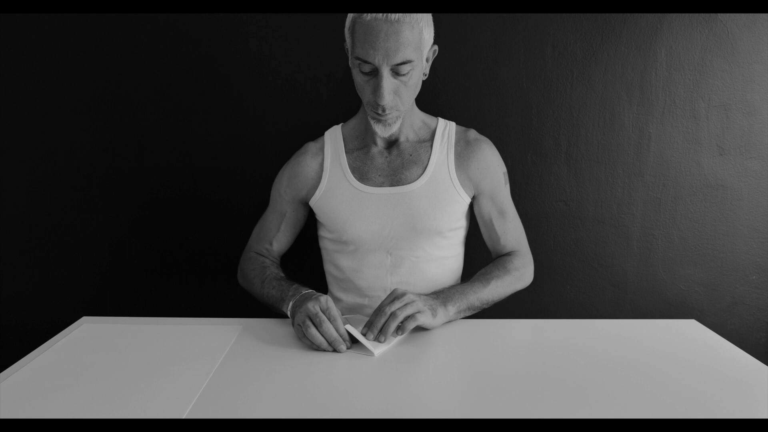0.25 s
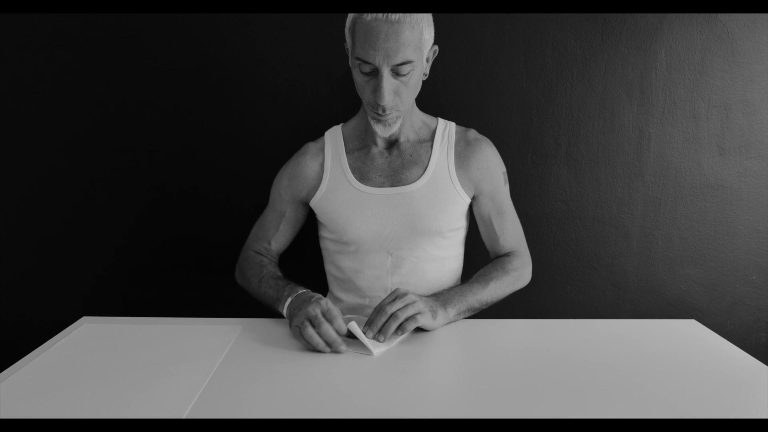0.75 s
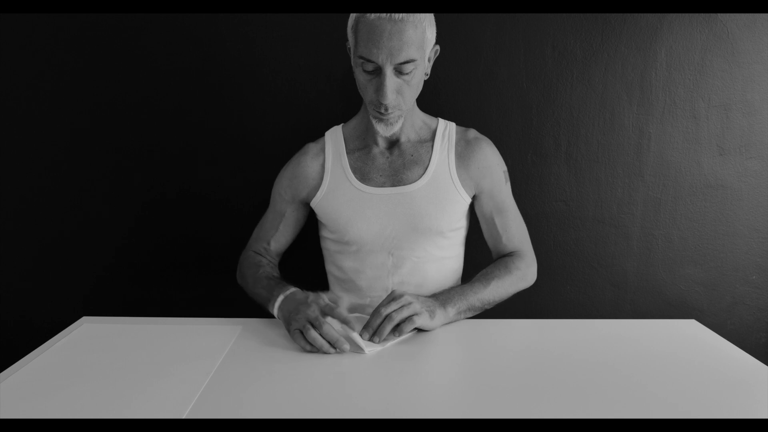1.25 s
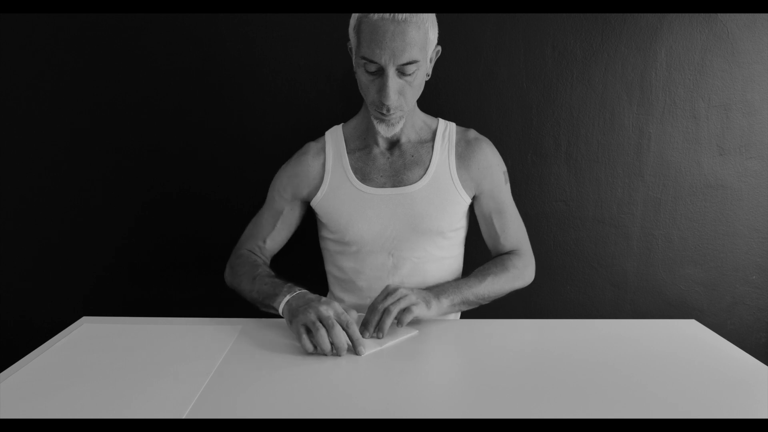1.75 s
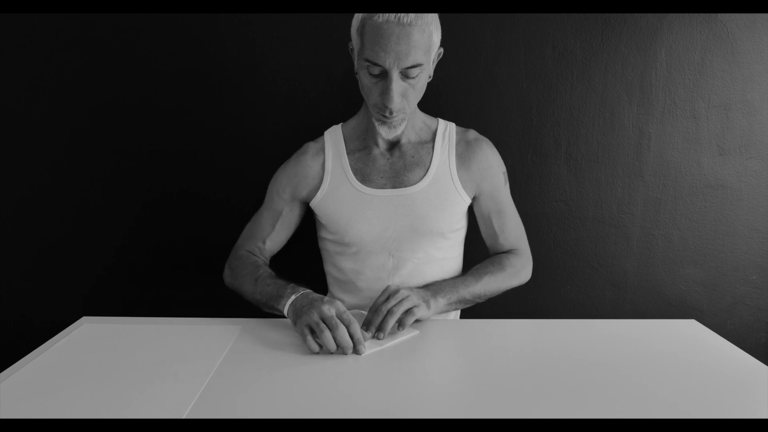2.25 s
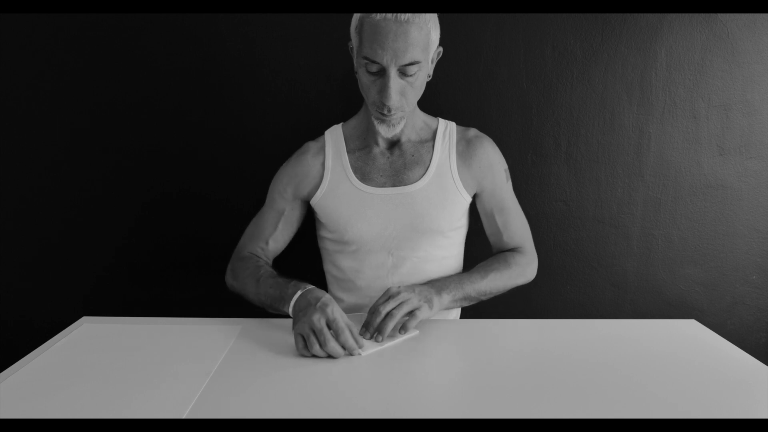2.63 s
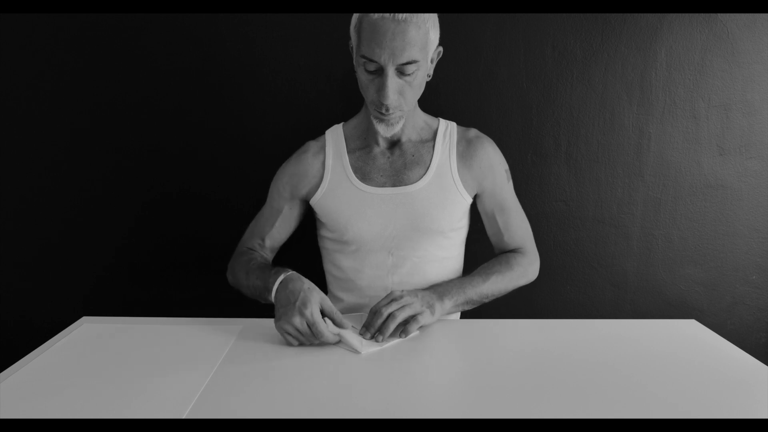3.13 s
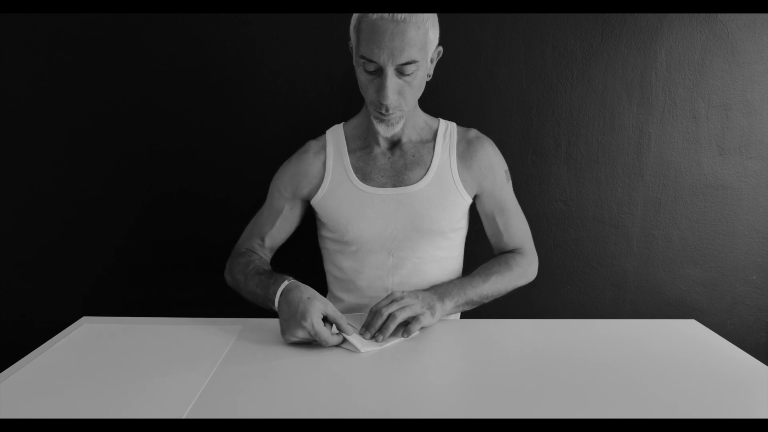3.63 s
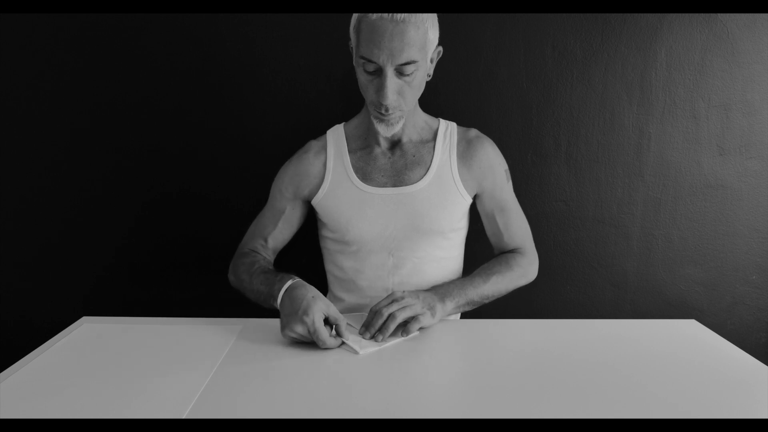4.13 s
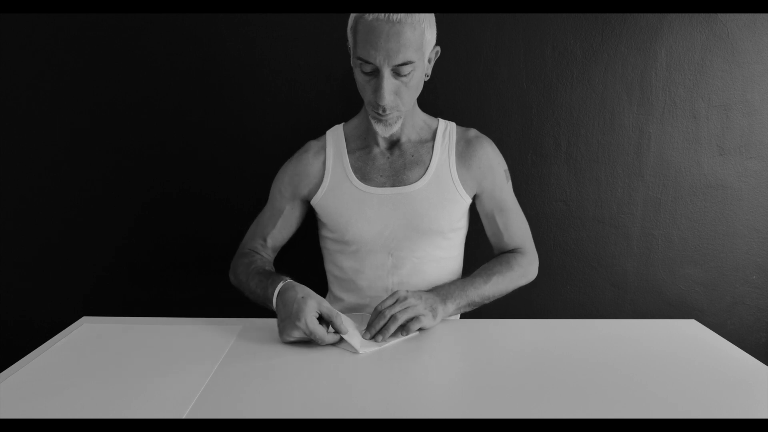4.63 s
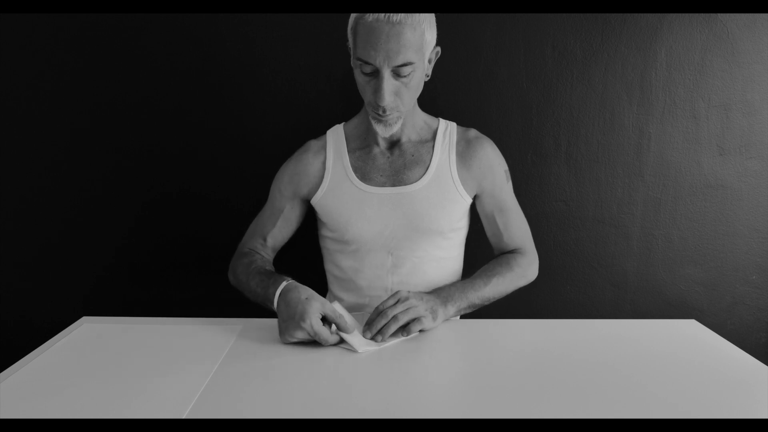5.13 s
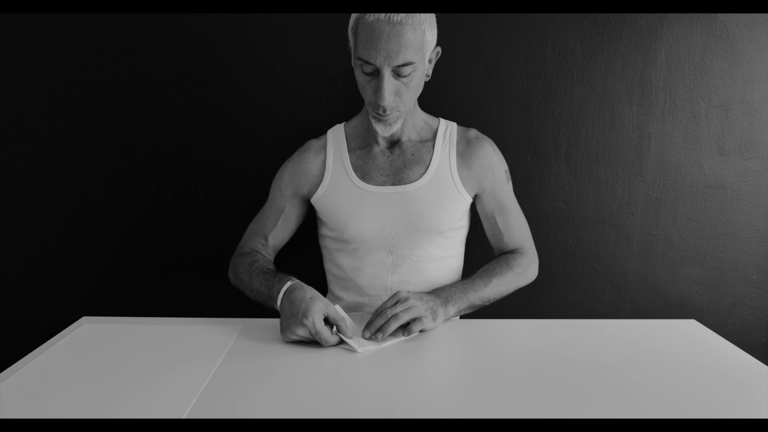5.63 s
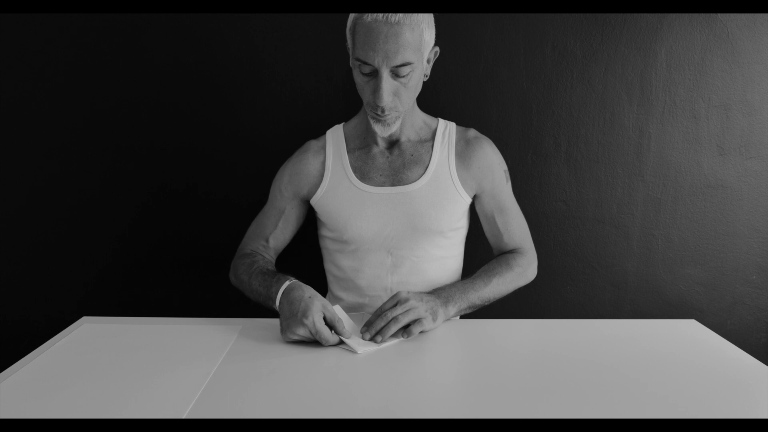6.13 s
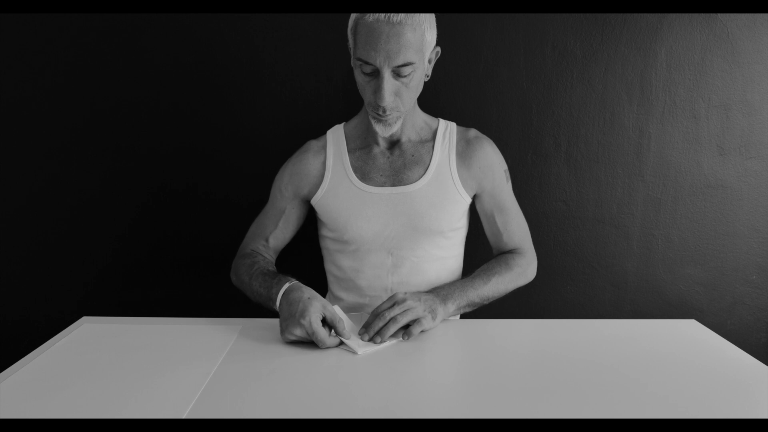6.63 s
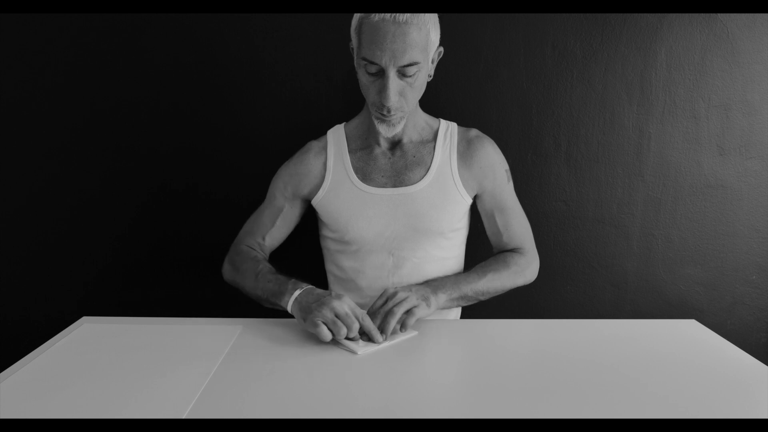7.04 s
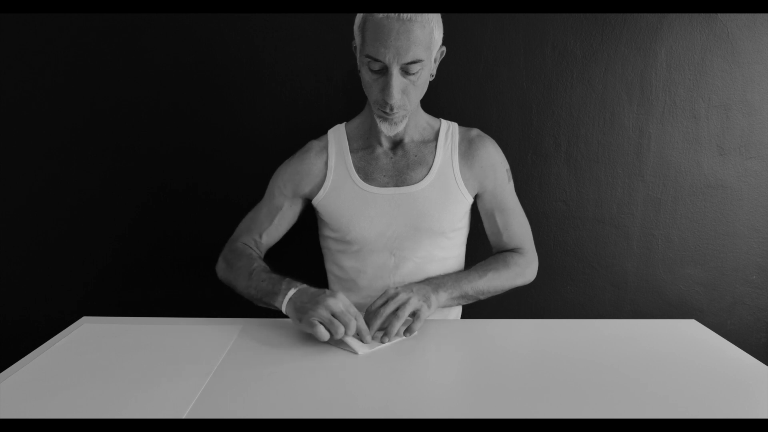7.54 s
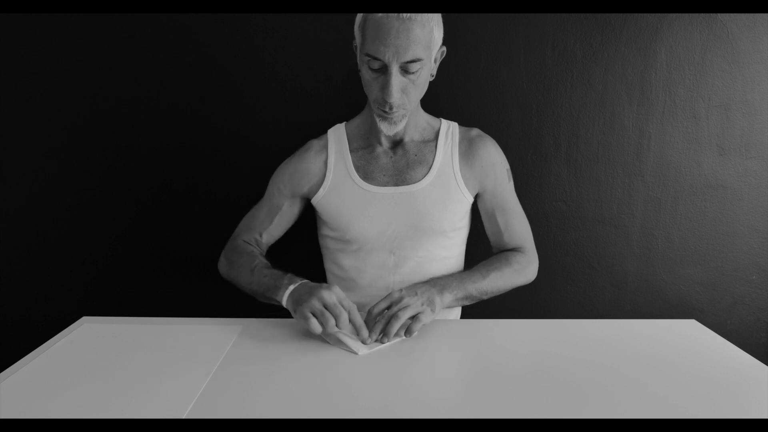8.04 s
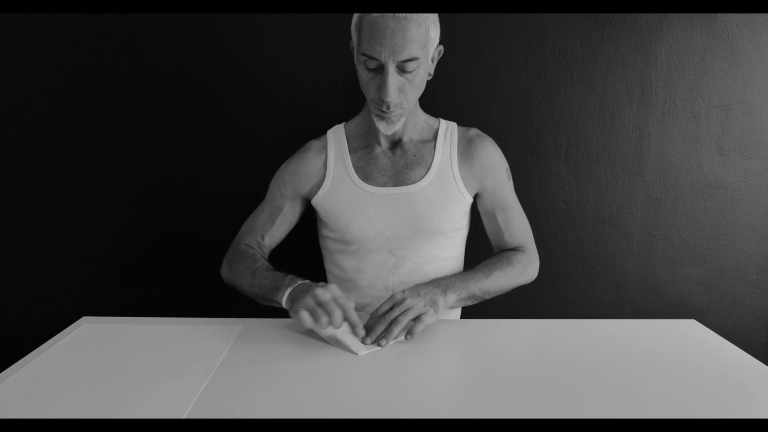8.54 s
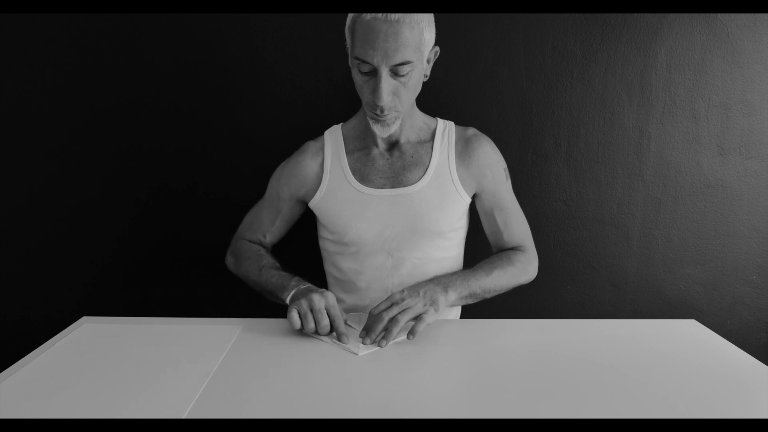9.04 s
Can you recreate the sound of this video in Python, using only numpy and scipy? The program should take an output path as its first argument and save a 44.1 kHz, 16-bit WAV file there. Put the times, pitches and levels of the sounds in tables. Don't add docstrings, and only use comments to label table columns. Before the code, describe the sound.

In a bare, hard-walled room, hands fold a small stiff paper sheet on a table, heard from a few metres by a stereo camera microphone. Creases snap at 0 and 0.25 s with short hissing rubs, then light rustles. At 1.3 s a crease and a tabletop slap, then almost nothing until a hard crack at 2.7 s and a shuffle. Around 3.2-3.6 s small ticks, a snap and a breathy whistle of air squeezed from the fold. Frequent snaps and scrapes run from 4.2 to 5.7 s. A distant low motor drones very faintly about 5.7-6.4 s. Sparse creases follow at 6.2 and 6.9 s, small rustles at 7.3-7.5 s, a dull knock with a crease at 7.9 s, and the brightest, loudest crack at 8.4 s with a long rub. Faint ticks end near 9 s. Echoes are clipped short, leaving quiet pauses.

```python
import sys
import numpy as np
from scipy import signal
from scipy.fft import rfft, irfft
from scipy.io import wavfile
from scipy.ndimage import uniform_filter1d

SR = 44100
rng = np.random.default_rng(int(sys.argv[2]) if len(sys.argv) > 2 else 0)


def store_pcm(level_fs):
    pcm = np.round(np.clip(level_fs, -1, 1) * 32767).astype(np.int16)
    wavfile.write(sys.argv[1], SR, np.atleast_2d(pcm).T)


def gain_from_db(level_db):
    decades = np.asarray(level_db, float) / 20
    return 10 ** decades


N = 409248
STEP = 100

# start in seconds, peak in dB, ring of the sheet in Hz,
# echo level in dB, brightness in dB.
CREASES = [(0.0415, -11.5, 1190, -30.5, -3.5), (0.241, -7, 4000, -36, -3), (0.2625, -22, 8700, -28.5, 4),
           (1.276, -14.5, 1200, -28.5, -4), (2.682, -55, 4090, -35.5, 10.5), (2.69, -2, 4000, -23.5, -1.2),
           (3.4361, -8, 2230, -39, -7.5), (7.027, -15.5, 2770, -48, 8), (4.2112, -6.5, 7000, -33.5, 4),
           (4.5568, -11.5, 2400, -28.5, -6), (4.679, -17, 2290, -33.5, -1.1), (4.692, -16, 2000, -35, -2),
           (5.0616, -8, 3420, -25.5, 0.2), (5.2609, -17, 2170, -42, -2.5), (5.6254, -4.5, 4080, -28, 7.5),
           (5.636, -15.5, 4270, -29.5, -2), (5.6649, -6, 6230, -27.5, -2),
           (6.1821, -18.5, 2740, -34.5, -0.5), (6.9041, -10, 2710, -34.5, 1.5), (7.9238, -9, 2400, -30, -4),
           (8.2582, -19, 2100, -34, -2), (8.327, -17.5, 2980, -36, -1.5), (8.392, -7, 6500, -29, 15.5),
           (8.4066, 0.8, 4770, -33, 13)]
# start in seconds, length in seconds,
# level in dB, brightness in dB, extra middle range in dB.
PULLS = [(.001, 0.15, -26.5, 0, -3), (.562, .04, -44, 5, 2), (.748, .06, -39, 4, 1),
         (.266, 0.1, -18.5, -0.5, 0), (1.228, 0.17, -34, 1, 1.5), (2.685, 0.18, -29.5, 8.5, 11.5),
         (3.155, 0.14, -42.5, 0.5, -4), (3.34, 0.09, -38, -3, -2), (3.44, 0.07, -30, -4.5, 0),
         (4.21, 0.12, -47, 16.5, 17.5), (4.44, 0.11, -46, -11, -13), (4.678, 0.09, -24.5, 1.2, -2.5),
         (4.97, 0.062, -48, -5, 4), (5.06, 0.089, -24, 0.7, 0.5), (5.63, 0.18, -26.5, 5.5, 6),
         (6.19, 0.057, -41.5, 16, 18), (6.91, 0.17, -32, -1.2, 2.5), (7.725, 0.13, -37, -1, -2),
         (7.93, 0.11, -26.5, -5, -1), (8.26, 0.14, -30.5, -3, -14), (8.4, 0.21, -28, 6.5, -8),
         (8.975, 0.1, -44.5, 3, 3)]
# time of the top in seconds, length in seconds,
# level in dB, brightness in dB, extra middle range in dB.
SHUFFLES = [(.57, 0.021, -48, -2, 3), (.22, 0.04, -34, -3, 1), (.41, .04, -40, -5, 2),
            (.78, 0.03, -35, -1, 2), (.86, 0.087, -46.5, -3.5, -3), (1.55, 0.042, -50, -2, -6),
            (1.68, 0.029, -42, 2, -1), (2.0, 0.18, -58, -0.5, 0), (2.47, 0.087, -62, 0, -3.5),
            (2.64, 0.026, -52.5, 1.5, -13), (2.86, 0.084, -25, 0.5, 2), (3.57, 0.14, -47, -2, 1),
            (4.52, 0.021, -48, 11.5, 2), (5.13, 0.05, -22.5, 1, -2), (5.52, 0.017, -53.5, 2.5, -7),
            (6.74, 0.043, -54.5, 6, 2.5), (6.86, 0.052, -46, 10.5, 1), (7.29, 0.073, -40.5, 3, -2.5),
            (7.385, 0.012, -35.5, 5.5, 0), (7.45, 0.02, -36.5, 2.5, 2), (7.8, 0.11, -39, 4, -5),
            (3.78, 0.14, -64, -7, -13), (5.25, 0.048, -29, -2.5, -22)]


def tint(x, points):
    size = 2048
    hz, gain_db = np.transpose(points)
    bin_hz = np.arange(size // 2 + 1) * SR / size
    log_gain = np.interp(np.log(bin_hz + 1), np.log(hz), gain_db) * np.log(10) / 20
    cepstrum = irfft(log_gain, size)
    cepstrum[1:size // 2] *= 2
    cepstrum[size // 2 + 1:] = 0
    response = irfft(np.exp(rfft(cepstrum)), size)
    return signal.fftconvolve(x, response)[:len(x)]


def band(x, lo_hz, hi_hz):
    sos = signal.butter(2, [lo_hz, min(hi_hz, .45 * SR)], "band", fs=SR, output="sos")
    y = signal.sosfilt(sos, x)
    return y / np.sqrt(np.mean(y ** 2))


def curve(table):
    s, *columns = np.transpose(table)
    return [np.interp(np.arange(N) / SR, s, c) for c in columns]


def walk(rate):
    hold = int(SR / rate)
    levels = np.repeat(rng.standard_normal(N // hold + 1), hold)
    return 1.12 * uniform_filter1d(levels, hold)[:N]


def add(bus, s, x):
    i = int(s * SR)
    bus[i:i + len(x)] += x[:N - i]


def swell(s, length, rise_s, sag_db_s, fall_db_s):
    t = np.arange(0, N, STEP) / SR - s
    hold = -sag_db_s * np.clip(t, 0, length)
    fall = -fall_db_s * np.maximum(t - length, 0)
    return np.where(t < 0, 20 * t / rise_s, hold + fall)


def smooth(x):
    return np.interp(np.arange(N), np.arange(0, N, STEP), x)


def strokes():
    let_go_db_s = 202.5, 302, 332
    settle_db, settle_db_s = (-25.5, -30.5, -33), (28.5, 28.5, 25)
    creep_db, creep_s = -26, 0.057
    power = np.zeros((3, len(range(0, N, STEP)))) + 1e-12
    for table, rise_s, sag_db_s in (PULLS, 0.016, 52.5), (SHUFFLES, 0.086, 55.5):
        for s, length, db, tilt_db, middle_db in table:
            for k, range_db in enumerate((db - tilt_db, db + middle_db, db + tilt_db)):
                stroke = gain_from_db(range_db + swell(s, length, rise_s, sag_db_s, let_go_db_s[k]))
                settle = gain_from_db(range_db + settle_db[k] + swell(s, 0, rise_s, 0, settle_db_s[k]))
                creep = gain_from_db(range_db + creep_db + swell(s, 0, creep_s, 0, let_go_db_s[k]))
                power[k] += stroke ** 2 + settle ** 2 + creep ** 2
    return [smooth(10 * np.log10(p)) for p in power]


def hush(hush_db=-3, lead_s=0.025):
    out, lead = np.zeros(N), int(lead_s * SR)
    for s, peak_db, *_ in CREASES:
        if peak_db > -26 and s > lead_s:
            i = int(s * SR)
            out[i - lead:i] = hush_db * np.sqrt(np.arange(lead) / lead)
    return out


def patchy(x, patchy_db=2.6):
    _, _, spectra = signal.stft(x, SR, nperseg=512)
    field = uniform_filter1d(rng.standard_normal(spectra.shape), size=3, axis=0)
    field = uniform_filter1d(field, size=9, axis=1)
    gain = gain_from_db(patchy_db * field / field.std() - 1.17)
    return signal.istft(spectra * gain, SR, nperseg=512)[1][:N]


def rub(levels, flicker_db=0.5, own_db=1.27, grit_db=4.5, grit_share=0.006):
    # pitch in Hz, level in dB.
    rub_colour = [(700, 0.5), (1100, -1), (2200, 7.5), (4000, 5.5), (7000, 7), (10000, 3.5), (13000, -5.5),
                  (15500, -12.5)]
    caught = rng.random(N) < grit_share
    grit = 1 + caught * gain_from_db(grit_db * np.minimum(rng.exponential(size=N), 2.8))
    fibres = tint(grit * rng.standard_normal(N), rub_colour)
    flutter_db = flicker_db * walk(60) + hush()
    out = 0
    for level_db, (lo, hi) in zip(levels, [(900, 4140), (2800, 6980), (5400, 25000)]):
        gain = gain_from_db(level_db - 7.5 + flutter_db + own_db * walk(30))
        out = out + gain * band(fibres, lo, hi)
    return patchy(out)


def facing(x):
    # time in seconds, treble change in dB.
    turns = [(0, 1.5), (.4, 1.5), (.55, 5), (.9, 5), (1.3, -1.5), (2.8, -3.5), (3.0, -5), (3.3, 2),
             (3.5, -5), (3.9, 5), (4.22, 1.5), (4.33, -7), (4.52, 6), (4.6, -5), (4.72, 0), (5.0, -2),
             (5.7, -0.8), (5.85, -14), (6.0, 2), (6.17, -14), (6.3, -22), (6.9, 4.5), (7.15, 2), (7.3, 8),
             (7.5, 6), (7.72, 0), (7.8, 9.5), (7.95, 2), (8.42, -2.5), (8.55, -13), (8.7, -22), (8.9, 9)]
    sos = signal.butter(2, 10600, "high", fs=SR, output="sos")
    treble = signal.sosfiltfilt(sos, x)
    return x + (gain_from_db(curve(turns)[0]) - 1) * treble


def opening():
    open_db, hold_s, close_db_s, slew_s = -58, 0.044, 22, 0.15
    full_db, share = -49.5, 0.66
    db = []
    for s, length, level_db, *_ in list(PULLS) + list(SHUFFLES):
        missing_db = share * min(level_db - full_db, 0)
        db.append(missing_db + swell(s, length + hold_s, .03, 0, close_db_s))
    return open_db + uniform_filter1d(smooth(np.max(db, axis=0)), int(slew_s * SR))


def air(treble_share=1.55):
    # pitch in Hz, level in dB per Hz.
    air_colour = [(24, -56), (40, -38), (166, -2.5), (389, -2.5), (440, 3.5), (512, -3), (625, -2),
                  (1320, -10), (3170, -9.5), (6550, -14), (10000, -18.5), (14600, -34), (15700, -48)]
    level_db = opening()
    noise = tint(rng.standard_normal(N), air_colour)
    body = signal.butter(2, [150, 700], "band", fs=SR, output="sos")
    noise = noise / np.std(signal.sosfilt(body, noise))
    low = signal.sosfilt(signal.butter(1, 900, fs=SR, output="sos"), noise)
    treble_db = -65.5 + treble_share * (level_db + 59.5)
    return gain_from_db(level_db) * low + gain_from_db(treble_db) * (noise - low)


def creases():
    # start in seconds, peak in dB, ring in Hz, brightness in dB.
    ticks = [(.0385, -24, 2000, -5), (4.665, -28, 6500, 5), (.5218, -31, 3050, -4), (.5482, -36, 3410, 1.5),
             (.5687, -32, 4070, 4), (.737, -34, 4220, -2.1), (1.2205, -35, 2100, -8),
             (1.2253, -30, 2110, -1.5), (2.6627, -38, 4000, .1), (3.153, -43, 2400, -2.5),
             (3.221, -43, 2300, -7), (3.245, -38, 2170, -9), (3.2862, -35, 2360, 7),
             (3.3361, -25, 6000, .1), (4.4375, -36, 2600, -6), (4.4676, -31, 2300, 3),
             (4.9223, -43, 2250, -3), (4.9683, -26, 2400, 2.1), (6.7116, -43, 2680, 4),
             (6.7366, -42, 6660, 3), (6.8329, -37, 7100, 3), (4.1945, -30, 3880, 5), (4.186, -43, 7600, 8),
             (4.201, -25, 4060, 4), (8.2625, -22, 2160, -4), (5.6186, -26, 4400, 3), (8.337, -24, 3000, -2),
             (4.974, -31, 4840, 2), (2.4344, -54, 1070, -6), (2.5361, -56, 1470, -6),
             (7.659, -52, 1170, -3), (3.428, -24, 1500, -6), (7.7072, -31, 4590, -7),
             (8.9425, -42, 2450, -3), (8.964, -44, 4070, 2.1)]
    tick_echo_db = -15
    middle_hz, middle_octaves, middle_db = 4000, 0.47, 1
    rows = list(CREASES) + [(s, db, hz, db + tick_echo_db, tilt_db) for s, db, hz, tilt_db in ticks]
    out = []
    for s, db, hz, echo_db, tilt_db in rows:
        lift_db = middle_db * np.exp(-(np.log2(hz / middle_hz) / middle_octaves) ** 2)
        out.append((s, db, hz, echo_db - tilt_db, echo_db + lift_db, echo_db + tilt_db))
    return out


def snaps(ring_db=5, ring_width=.2, rough=.6, crack_s=.0011):
    direct, walls, t = np.zeros(N), np.zeros(N), np.arange(1024) / SR
    rows = creases()
    click = 1. * (t == 0)
    for (s, peak_db, hz, dull_db, mid_db, bright_db), noise in zip(rows, rng.standard_normal((len(rows), 1024))):
        top_db = bright_db - 14.5 + .6 * min(bright_db - mid_db, 0)
        body = [(600, dull_db - 26.5), (1300, dull_db - 6.0), (2200, dull_db),
                (4300, mid_db), (8000, bright_db - 4), (15000, top_db)]
        note = [(hz * (1 - ring_width), 0), (hz, ring_db), (hz * (1 + ring_width), 0)]
        clean = tint(tint(click + 0.09 * noise * np.exp(-t / 0.0063), body), note)
        crack = tint(tint(click + rough * noise * np.exp(-t / crack_s), body), note)
        add(direct, s, gain_from_db(peak_db - 3.5) * crack / np.abs(crack).max())
        power = gain_from_db(dull_db) ** 2 + gain_from_db(mid_db) ** 2 + gain_from_db(bright_db) ** 2
        add(walls, s, clean * np.sqrt(power / np.sum(clean ** 2)))
    return direct, walls


def flicks(slap_t60=0.016, note_cycles=2.3):
    # start in seconds, peak in dB, note in Hz.
    slaps = [
        (0.0418, -29, 1170),
        (0.291, -33, 1260),
        (1.277, -26, 1266),
        (2.6853, -39, 1210),
        (2.822, -33, 1254),
        (4.5585, -36, 1210),
        (5.0626, -41, 1203),
        (7.444, -46.5, 1120),
        (7.7526, -38, 1190),
        (8.408, -33.5, 1160),
    ]
    # start in seconds, peak in dB, note in Hz.
    notes_rung = [(.042, -31, 1595), (7.39, -41, 5880), (.77, -43, 3020), (.74, -47, 4100),
                  (.53, -50, 3300), (.76, -47, 5600), (5.235, -34, 2100), (5.236, -38, 1550),
                  (4.98, -46, 5800), (4.975, -47, 4100), (.565, -57, 4000), (1.3, -36, 1120),
                  (3.158, -49, 3020), (3.155, -46, 6140), (3.335, -38, 6100), (4.558, -26.5, 2830),
                  (4.211, -21, 7050), (4.212, -31, 3630), (4.558, -34, 4700), (4.558, -30.5, 6340),
                  (5.262, -37, 3100), (5.667, -33, 4100), (5.667, -24.5, 5950), (8.408, -16, 6650),
                  (8.964, -35, 4050), (8.99, -42, 4400), (8.964, -44, 4600), (8.964, -45, 6500),
                  (8.9435, -39.5, 2400), (3.25, -51, 3150), (3.4365, -37, 4000), (3.4365, -38, 5100),
                  (3.428, -41, 1150), (3.352, -46, 5800), (.565, -50, 3000), (4.975, -42, 4900),
                  (7.708, -41, 4540), (7.76, -41.5, 1500), (7.924, -36, 3800), (8.405, -32, 8100),
                  (4.211, -39, 2360), (4.469, -41, 5800), (6.905, -44.5, 6300), (7.708, -44, 1605),
                  (7.924, -26, 3150), (7.94, -35, 1350), (7.945, -33, 1720), (8.327, -35, 3080),
                  (7.924, -28.5, 1860), (7.926, -28, 2360)]
    out, t = np.zeros(N), np.arange(2048) / SR
    for s, peak_db, hz in slaps:
        shape = gain_from_db(-60 * t / slap_t60) * (1 - np.exp(-t * hz))
        add(out, s, gain_from_db(peak_db + .6) * shape * np.sin(2 * np.pi * hz * t))
    for s, peak_db, hz in notes_rung:
        u = t * hz / note_cycles
        add(out, s, gain_from_db(peak_db - .4) * u * np.exp(1 - u) * np.sin(2 * np.pi * hz * t))
    return tint(out, [(300, -30), (800, 0)])


def knocks(t60=.065, touch_s=.0028, dull=.3):
    # start in seconds, peak in dB, board note in Hz, depth below 200 Hz in dB.
    blows = [(0.291, -43, 686, -41), (1.29, -38, 795, -46), (2.689, -46, 447, -43),
             (3.435, -36.5, 454, -21.5), (4.677, -31, 430, -48), (5.059, -40.5, 462, -39),
             (5.234, -44.5, 661, -24), (5.664, -45.5, 374, -24), (6.904, -46, 471, -17),
             (7.747, -51, 490, -16), (7.922, -25, 430, -20), (7.925, -33, 620, -40), (3.437, -42, 800, -40),
             (1.28, -42, 520, -22), (0.045, -38, 1000, -40), (8.448, -46, 894, -43)]
    out, t = np.zeros(N), np.arange(4096) / SR
    soft = 1 - np.exp(-t / touch_s)
    for (s, peak_db, hz, deep_db), noise in zip(blows, rng.standard_normal((len(blows), 4096))):
        board = np.sin(2 * np.pi * hz * t) + 0.2 * np.sin(2 * np.pi * 0.88 * hz * t)
        rattle = dull * band(noise, 330, 750)
        thud = gain_from_db(deep_db + 10.5) * np.sin(2 * np.pi * 165 * t)
        add(out, s, gain_from_db(peak_db + 1.5 - 60 * t / t60) * soft * (board + rattle + thud))
    return signal.sosfilt(signal.butter(3, 135, "high", fs=SR, output="sos"), out)


def early(direct, spread_s=0.0014):
    # delay in seconds, level in dB.
    echoes = [
        (.0035, -9.5),
        (0.0108, -4),
        (0.0157, -5.5),
        (0.026, -10),
    ]
    near, t = direct.copy(), np.arange(256) / SR
    for s, db in echoes:
        scatter = rng.standard_normal(len(t)) * np.exp(-t / spread_s)
        scatter = scatter / np.linalg.norm(scatter)
        add(near, s, gain_from_db(db) * signal.fftconvolve(direct, scatter)[:N])
    return near


def room(build_s=0.0089, late_s=0.0038):
    # pitch in Hz, time to fade by 60 dB in seconds,
    # time in seconds at which the suppressor has taken 9 dB more.
    ring = [(150, 0.31, 3), (423, 0.27, 2), (1000, 0.53, -0.5), (2000, 0.57, 1.5), (4000, 0.68, 0.57),
            (6500, 0.7, 0.17), (9300, 0.54, -0.4), (13900, 0.23, -4)]
    t, out = np.arange(SR // 2) / SR, 0
    ring_hz, t60, knee = np.transpose(ring)
    edges = np.geomspace(70, 17900, 17)
    for lo, hi in zip(edges, edges[1:]):
        fade = gain_from_db(-60 * t / np.interp(lo, ring_hz, t60))
        fade = fade * np.exp(-(t / np.interp(lo, ring_hz, knee)) ** 2)
        out = out + np.sqrt((hi - lo) / SR) * fade * band(rng.standard_normal(len(t)), lo, hi)
    return out * (1 - np.exp(-np.maximum(t - late_s, 0) / build_s))


def suppress(mid, side, deepest_db=-24):
    # pitch in Hz, level in dB.
    noise_guess = [(100, -92.5), (1000, -90.5), (3000, -67.5), (8000, -74.5), (16000, -99.5)]
    hz, _, spectra = signal.stft(np.array([mid, side]), SR, nperseg=512)
    power = uniform_filter1d(np.abs(spectra[0]) ** 2, size=9, axis=0)
    power = uniform_filter1d(power, size=3, axis=1)
    guess_hz, guess_level_db = np.transpose(noise_guess)
    guess_db = np.interp(np.log(hz + 1), np.log(guess_hz), guess_level_db)
    ratio = np.abs(power / gain_from_db(guess_db)[:, None] ** 2) ** 1.1
    gain = gain_from_db(deepest_db) + (1 - gain_from_db(deepest_db)) * ratio / (1 + ratio)
    return signal.istft(spectra * gain, SR, nperseg=512)[1][:, :N]


def pocket():
    # start in seconds, peak in dB, fall in dB per second.
    squeezes = [
        (3.156, -41.5, 63),
        (3.344, -48, 397),
        (3.442, -27, 130),
        (3.5, -29, 200),
        (3.575, -41, 250),
        (1.215, -43, 40),
        (3.235, -47, 62),
        (3.68, -52, 350),
        (4.444, -58, 160),
        (4.972, -42, 97),
    ]
    # time in seconds, note in Hz.
    glide = [
        (1.3, 2090),
        (3.15, 2340),
        (3.33, 2370),
        (3.44, 2293),
        (3.7, 2125),
        (4.4, 2370),
    ]
    width_hz, overtone, overtone_db, rise_s = 330, 1.33, -12, 0.013
    level = smooth(sum(gain_from_db(db + swell(s, 0, rise_s, 0, fall)) for s, db, fall in squeezes))
    slow = signal.butter(3, width_hz / 2, fs=SR, output="sos")
    breath = signal.sosfilt(slow, rng.standard_normal((2, N)))
    phase = 2 * np.pi * np.cumsum(curve(glide)[0]) / SR
    note = breath[0] * np.cos(phase) + breath[1] * np.sin(phase)
    note = note + gain_from_db(overtone_db) * breath[1] * np.cos(overtone * phase)
    return level * gain_from_db(-6.0 + 2.0 * walk(70)) * note / breath.std()


def drone():
    # time in seconds, level in dB.
    loudness = [
        (5.6, -96),
        (5.78, -59.5),
        (5.95, -64.5),
        (6.02, -74),
        (6.32, -72),
        (6.43, -90),
    ]
    # pitch in Hz, level in dB.
    lines = [(84, 1), (168, 2.5), (345, 1)]
    late_s = 0, 0, .28
    t, (s, level_db) = np.arange(N) / SR, np.transpose(loudness)
    out = 0
    for (hz, db), late in zip(lines, late_s):
        gain = gain_from_db(np.interp(t - late, s, level_db) + db + 2.1 * walk(6))
        out = out + gain * np.sin(2 * np.pi * hz * t)
    return out


def stereo(mid, side):
    # pitch in Hz, level in dB.
    side_colour = [(60, 15), (110, 1), (200, 4.5), (380, 1.5), (700, 0), (1290, -1), (2380, -4),
                   (4400, -13), (8120, -18.5), (15000, 3)]
    side = tint(side, side_colour)
    return np.array([mid + side, mid - side])


def scene():
    # pitch in Hz, level in dB.
    edge_on = [(3000, 0), (7000, -4), (11000, -12), (16000, -20)]
    direct, walls = snaps()
    table, rings = knocks(), flicks()
    near = early(tint(direct, edge_on) + table + gain_from_db(3.5) * rings)
    walls = gain_from_db(-1.0) * walls + gain_from_db(-16.0) * rings
    ring_mid = signal.fftconvolve(walls + gain_from_db(-19) * table, room())[:N]
    ring_side = signal.fftconvolve(walls + gain_from_db(-25) * table, room())[:N]
    ring_mid, ring_side = suppress(ring_mid, ring_side)
    motor, levels = drone(), strokes()
    mid = facing(near + ring_mid + rub(levels)) + pocket() + air() + motor
    side_paper = facing(ring_side + rub(levels)) + pocket()
    side = gain_from_db(-15.5) * near + gain_from_db(-8.5) * side_paper + air() + gain_from_db(-14) * motor
    return stereo(mid, gain_from_db(2) * side)


def band_limit(x):
    return signal.sosfilt(signal.butter(12, 17020, fs=SR, output="sos"), x)


def record(dry):
    limit, bass_hz, top_hz = .36, 90, 15850
    rounded = limit * np.tanh(dry / limit)
    thin = signal.sosfilt(signal.butter(2, bass_hz, "high", fs=SR, output="sos"), rounded)
    thin = signal.sosfilt(signal.ellip(10, .2, 70, top_hz, fs=SR, output="sos"), thin)
    return band_limit(thin)


dry = scene()
out = record(dry)
store_pcm(out)
```